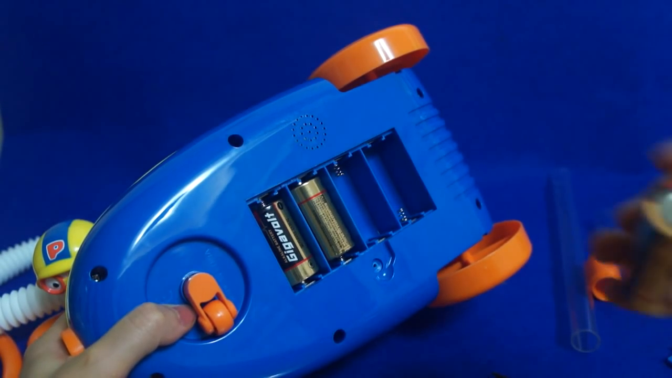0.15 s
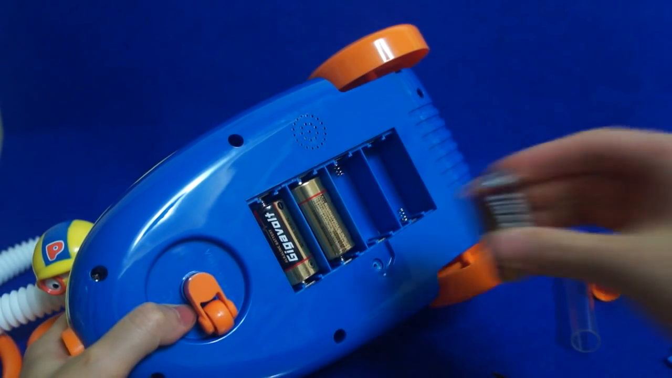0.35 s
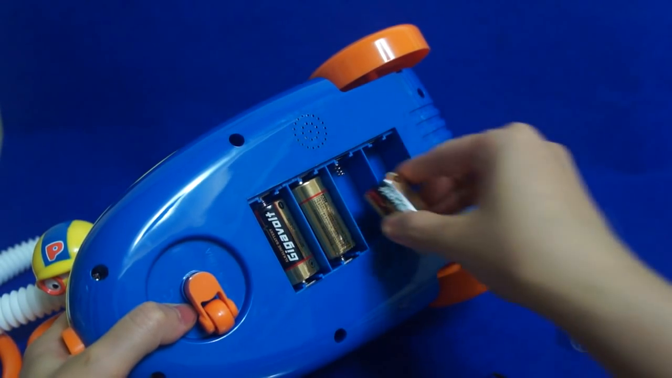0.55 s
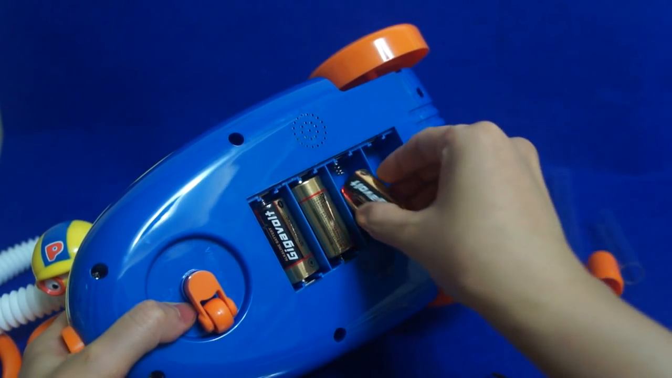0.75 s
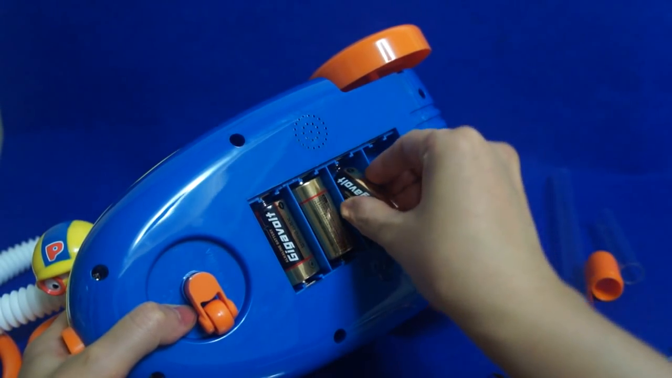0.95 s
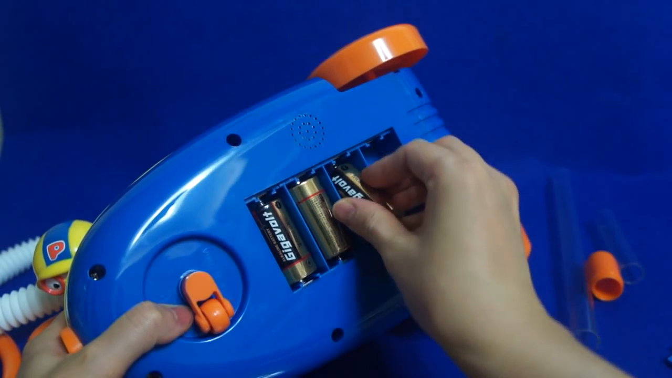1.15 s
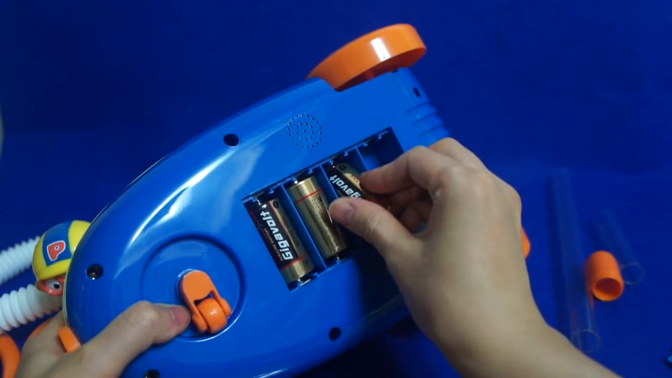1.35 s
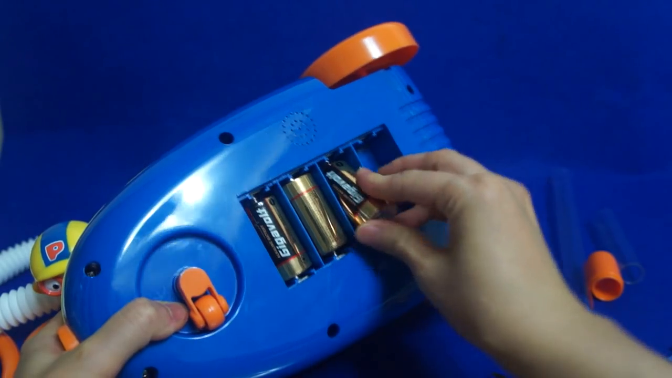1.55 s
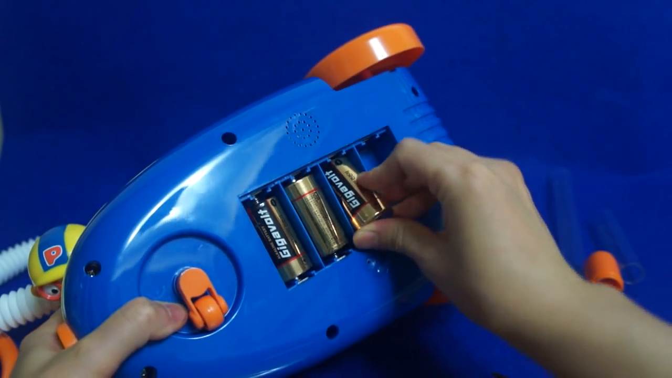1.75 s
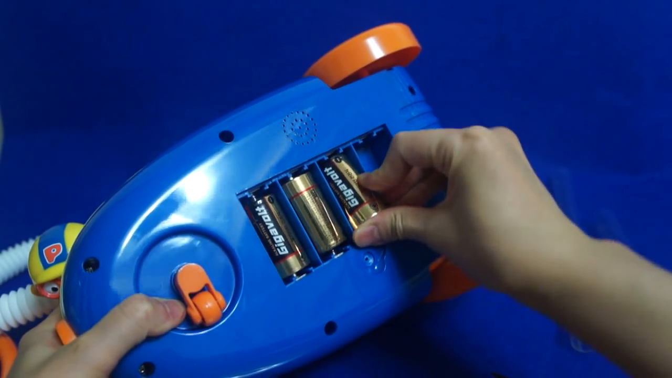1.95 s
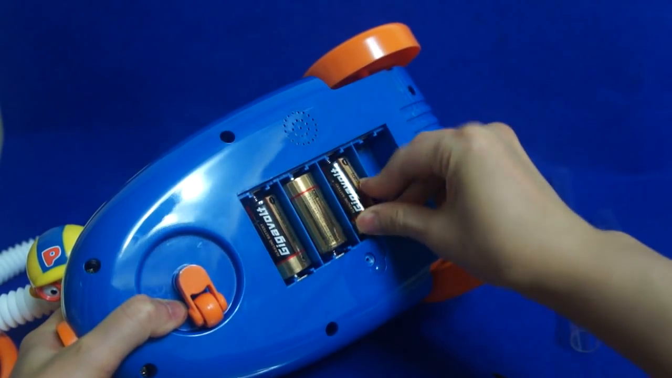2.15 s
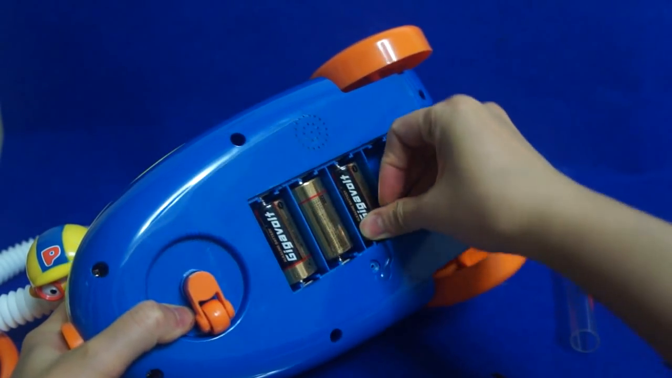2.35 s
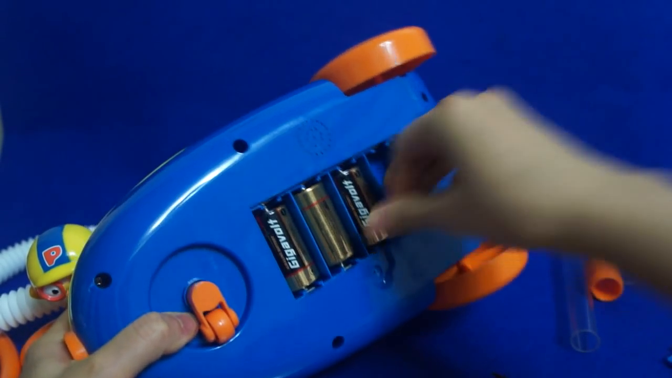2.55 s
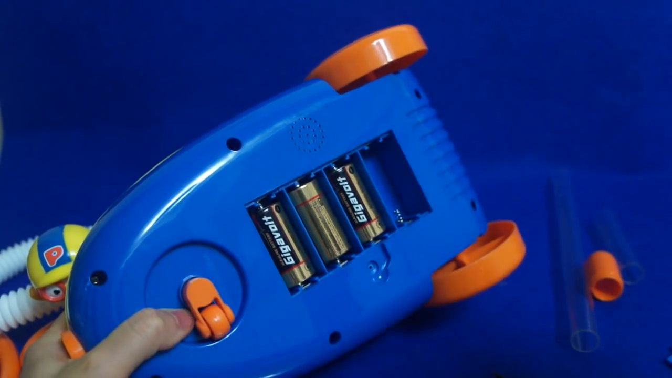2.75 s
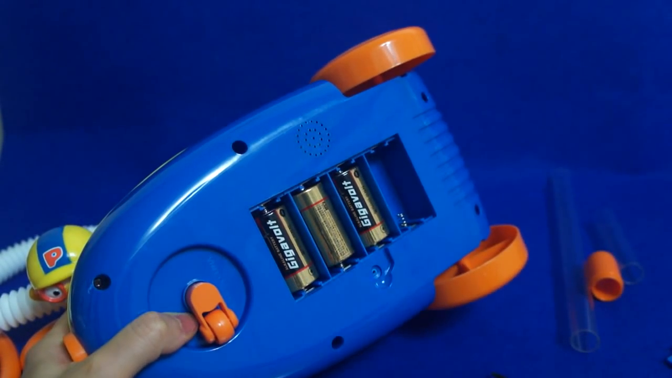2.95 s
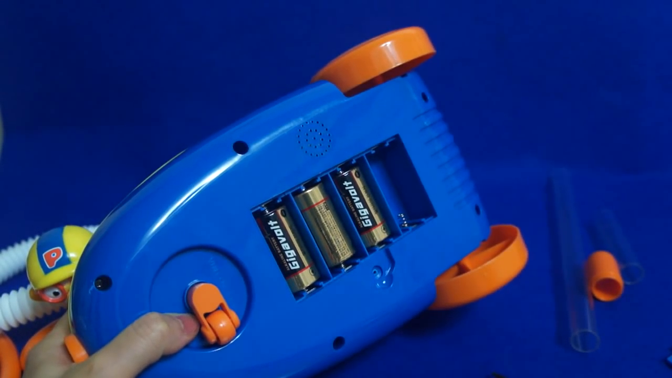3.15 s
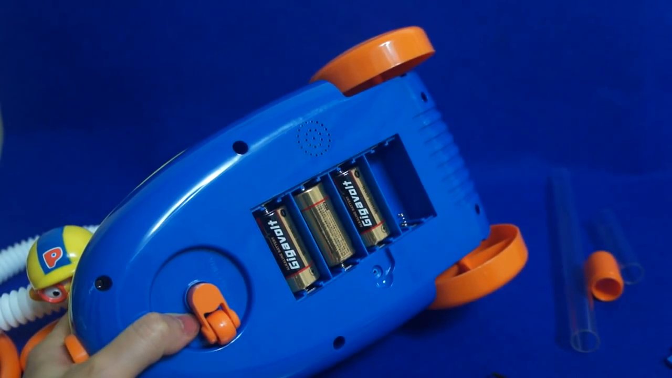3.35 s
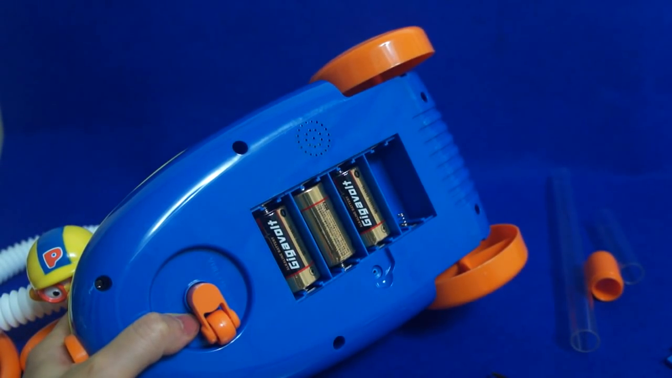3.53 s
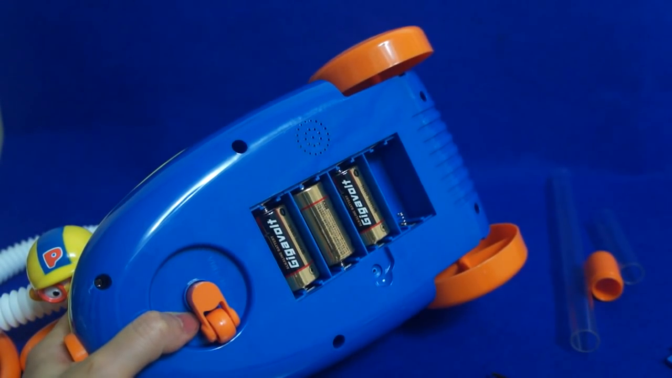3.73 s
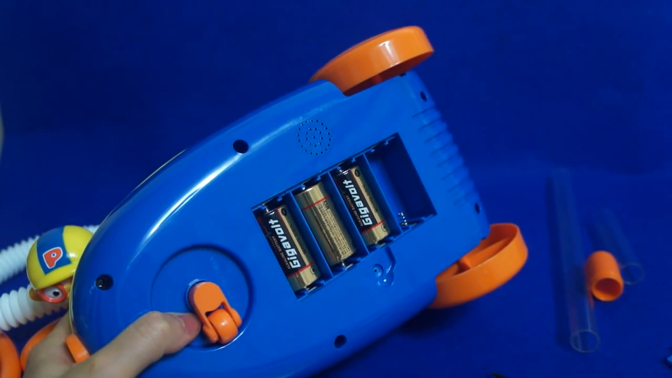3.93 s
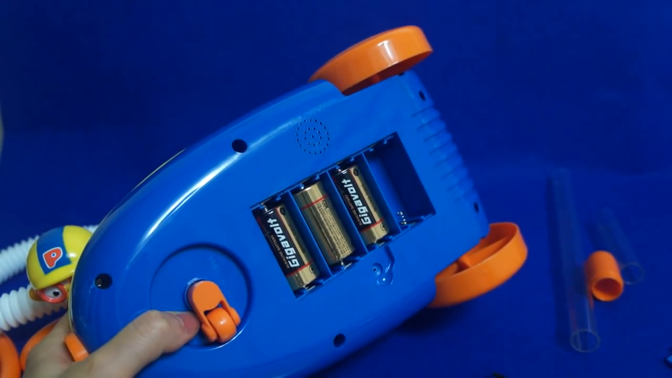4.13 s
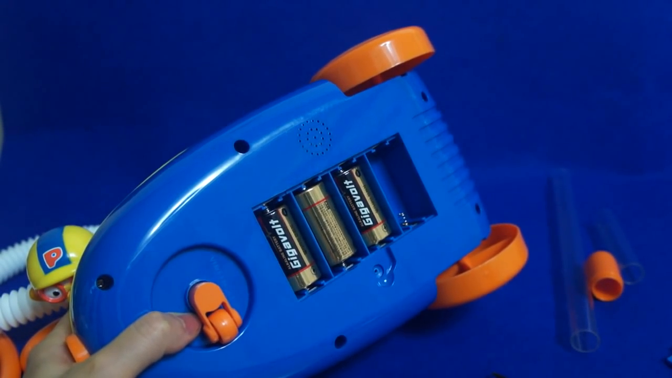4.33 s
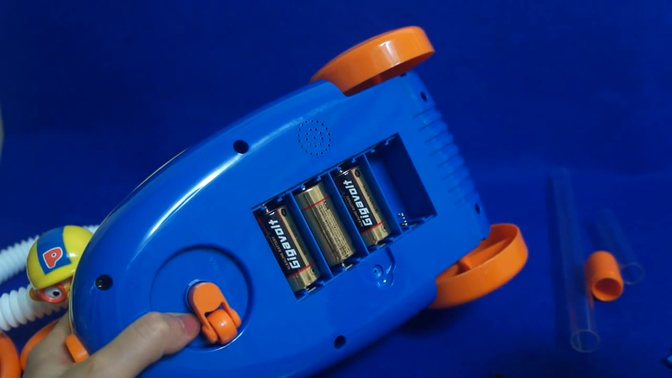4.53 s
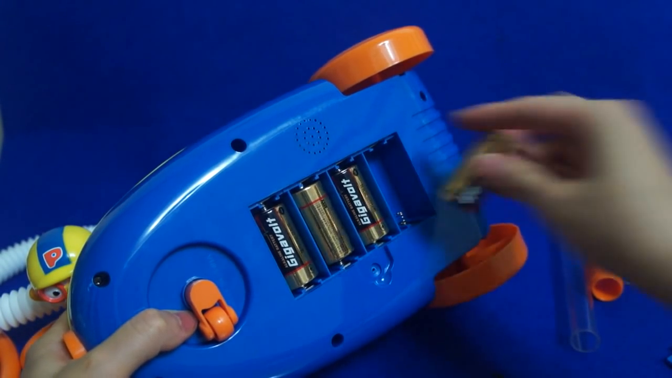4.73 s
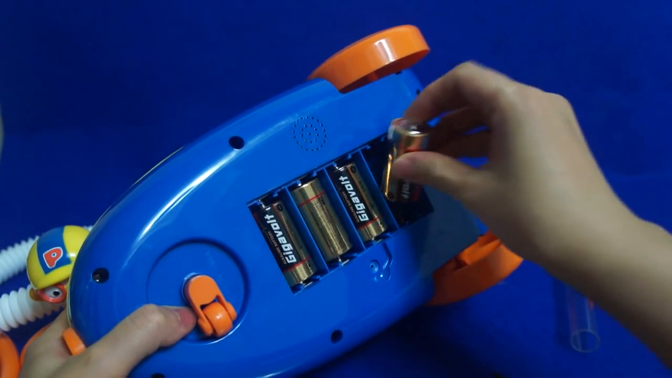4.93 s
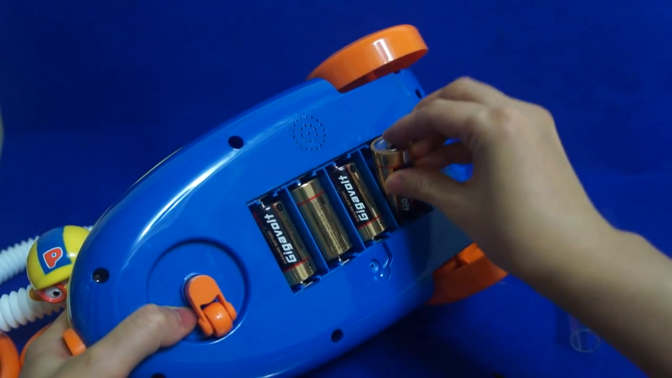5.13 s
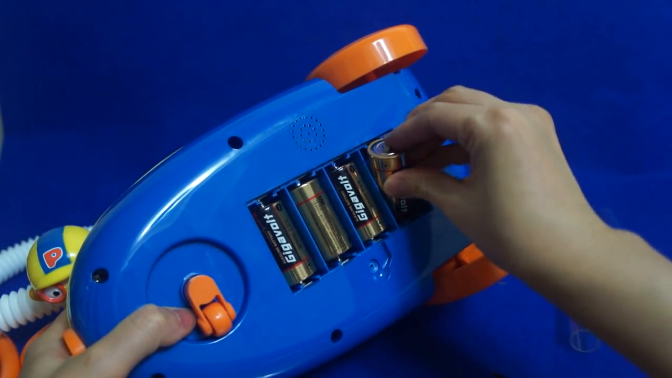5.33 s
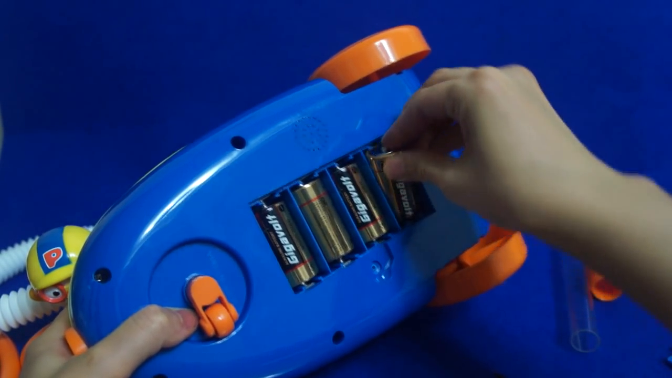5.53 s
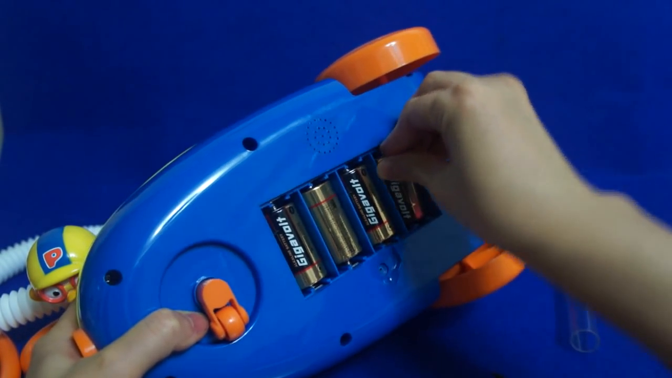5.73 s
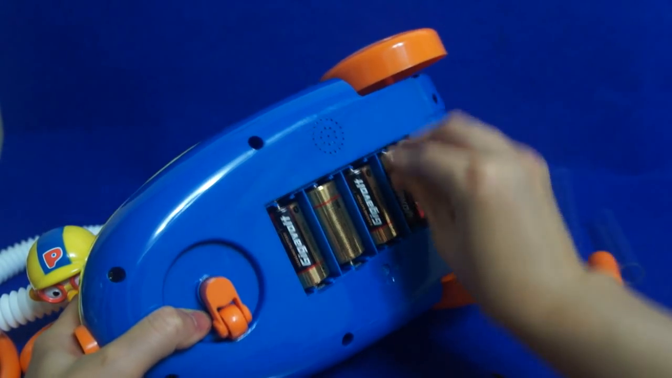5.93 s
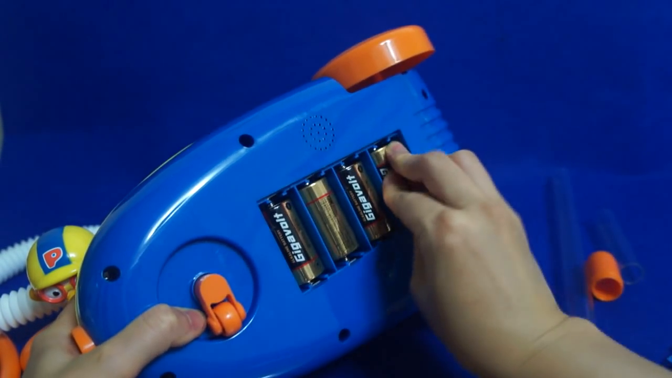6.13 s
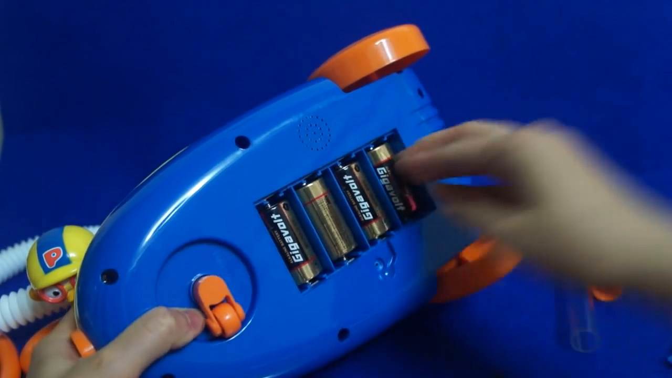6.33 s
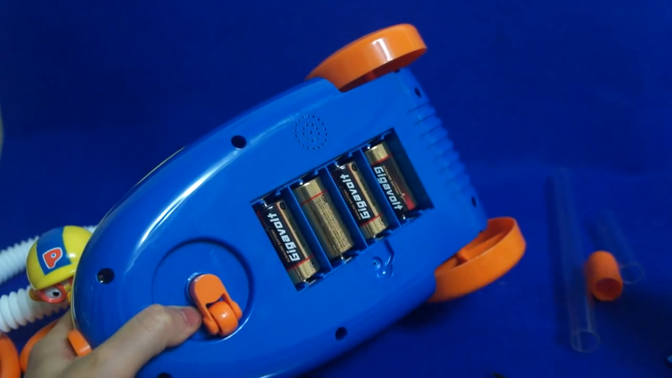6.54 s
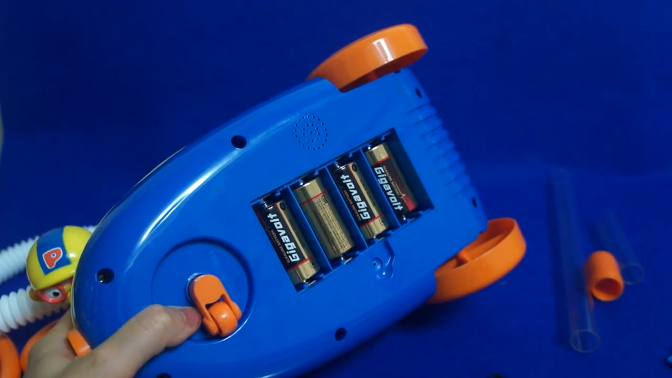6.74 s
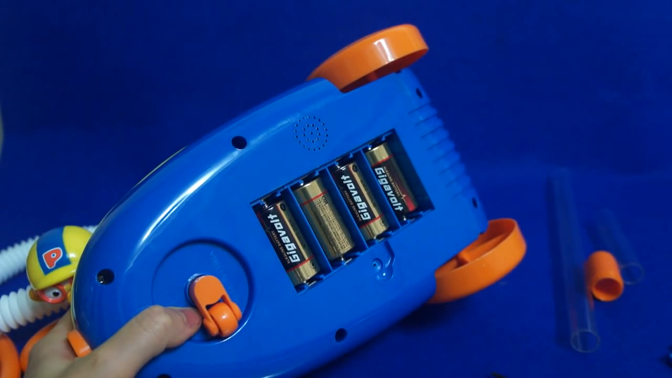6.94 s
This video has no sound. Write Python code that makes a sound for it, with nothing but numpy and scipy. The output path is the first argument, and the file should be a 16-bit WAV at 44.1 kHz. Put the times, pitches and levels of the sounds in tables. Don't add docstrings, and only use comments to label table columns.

```python
import sys
import numpy as np
from scipy import signal
from scipy.fft import rfft, irfft, next_fast_len
from scipy.io import wavfile
from scipy.ndimage import uniform_filter1d

SR = 44100
rng = np.random.default_rng(int(sys.argv[2]) if len(sys.argv) > 2 else 0)


def boost_factor(decibels):
    exponent = np.asarray(decibels, float) / 20
    return 10 ** exponent


def put_to_file(sound):
    columns = np.atleast_2d(sound).T
    safe = np.clip(columns, -1, 1)
    whole_steps = np.round(safe * 32767)
    wavfile.write(sys.argv[1], SR, whole_steps.astype(np.int16))


N = 312228
SHELL_PAN_DB, SLOT_PAN_DB, STROKE_PAN_DB = -1.5, -5, -1.5


def evened(x):
    return x / np.sqrt(np.mean(x ** 2) + 1e-20)


def peak_one(x):
    return x / abs(x).max()


def read(points, hz):
    f, value = np.transpose(points)
    return np.interp(np.log(hz + 1), np.log(f + 1), value)


def colour(x, points, turn=1):
    size = next_fast_len(x.shape[-1])
    gain = boost_factor(read(points, np.fft.rfftfreq(size, 1 / SR)))
    return irfft(rfft(x, size) * turn * gain, size)[..., :x.shape[-1]]


def add(mix, s, sound, pan_db=0):
    part = mix[:, round(s * SR):][:, :len(sound)]
    left, right = boost_factor(pan_db / 2), boost_factor(-pan_db / 2)
    part += 2 * np.array([[left], [right]]) / (left + right) * sound[:part.shape[1]]


def resonate(x, hz, width_hz):
    turn = np.exp(2j * np.pi * hz * np.arange(len(x)) / SR)
    r = np.exp(-np.pi * width_hz / SR)
    return 2 * (turn * signal.lfilter([1 - r], [1, -r], x / turn)).real


def resonate_twice(x, hz, width_hz):
    return resonate(resonate(x, hz, width_hz), hz, width_hz)


def ring(modes, spread_db, rise_turns=0.079, detune=0.0095, size=5000, scatter=1):
    hz, db, t60 = np.transpose(modes)[:, :, None]
    t = np.arange(size) / SR
    weight, pitch, phase = rng.standard_normal((3, len(modes), 1))
    rise = 1 - np.exp(-t * hz / rise_turns)
    decay = boost_factor(db + spread_db * weight - 60 * t / t60)
    start = scatter * phase + np.arange(len(modes))[:, None] / 2
    return (rise * decay * np.sin(2 * np.pi * (hz * (1 + detune * pitch) * t + start))).sum(0)


# f/Hz, level/dB, t60/s
SHELL_MODES = [(440, -12, 0.029), (470.5, -0.5, 0.093), (502.6, -9, 0.13), (547.6, 11.5, 0.074),
               (589.5, 1, 0.083), (612, 3.5, 0.017), (685, -9.5, 0.014)]
# f/Hz, level/dB, t60/s
WALL_MODES = [(726, -12.5, 0.05), (791, -11, 0.049), (818, -7.5, 0.037), (913, -1, 0.035), (969, -4, 0.049),
              (1071, -1.5, 0.031), (1131, 3.5, 0.032), (1217, 0.5, 0.027), (1296, -2.5, 0.043),
              (1364, -5.5, 0.032), (1472, -3.5, 0.027), (1647, -6, 0.031), (1770, -6.5, 0.022),
              (1850, -5, 0.023)]
# f/Hz, level/dB, t60/s
RIB_MODES = [(2048, -8.5, 0.03), (2205, -9, 0.032), (2550, -9, 0.016), (2730, -13, 0.02),
             (3200, -16.5, 0.018), (4000, -15, 0.017), (4500, -28, .015)]
HELD_RING = 0.73
HARD_TIP_SAMPLES, SOFTER_SAMPLES_PER_DB = 6, 0.4


def knock(shell_db, walls_db, contact_ms, free):
    t_ms = np.arange(900) / SR * 1000
    chatter = rng.standard_normal(900) * (rng.random(900) < 0.04) * np.exp(-t_ms / contact_ms)
    pulse = np.hanning(round(HARD_TIP_SAMPLES - SOFTER_SAMPLES_PER_DB * walls_db))
    blow = np.convolve((t_ms == 0) + 0.45 * chatter, pulse)
    shell_ring = ring(np.multiply(SHELL_MODES, [1, 1, free]), 3.0, rise_turns=0.23, size=4500)
    wall_modes = np.multiply(WALL_MODES + RIB_MODES, [1, 1, HELD_RING])
    wall_ring = ring(wall_modes, 1.0, size=2000, scatter=0.098)
    shell = signal.fftconvolve(blow, shell_ring)
    walls = signal.fftconvolve(blow, wall_ring)
    walls = np.pad(walls, (0, len(shell) - len(walls)))
    return boost_factor(shell_db) * peak_one(shell) + boost_factor(walls_db + 0.5) * peak_one(walls)


# t/s, shell peak level/dB, walls peak level/dB
FIRST_KNOCKS = [(0.7487, -19.5, -29), (0.753, -33, -38), (0.764, -50, -31), (0.791, -33, -66),
                (0.893, -42.5, -53), (1.001, -41.5, -69), (1.03, -41, -44), (1.1155, -53, -37.5),
                (1.311, -28, -36), (1.319, -45.5, -47), (1.337, -30, -40), (1.357, -31, -42),
                (1.575, -47, -44.5), (1.648, -41, -38.5), (1.761, -38, -32), (1.789, -37, -46),
                (1.832, -35.5, -42), (1.8365, -35, -33), (1.842, -36, -35.5), (1.865, -50, -53),
                (2.046, -39.5, -36.5), (2.127, -35.5, -33.5), (2.14, -32, -26), (2.214, -46, -61),
                (2.27, -35.5, -27), (2.3235, -22, -14), (2.329, -20.5, -12.5), (2.346, -22.5, -18),
                (2.361, -17, -24), (2.394, -36, -46.5), (2.778, -46, -47), (2.787, -44, -43),
                (4.279, -51.5, -47), (4.295, -42, -49)]
# t/s, shell peak level/dB, walls peak level/dB
SECOND_KNOCKS = [(4.9645, -10.5, -13.5), (4.978, -13.5, -18), (5.007, -25, -39), (5.0755, -16.5, -24.5),
                 (5.089, -22, -58), (5.193, -58, -37.5), (5.233, -23.5, -21), (5.251, -52, -41),
                 (5.3, -17, -18), (5.648, -28.5, -37), (5.655, -41.5, -35), (5.708, -31, -38),
                 (5.732, -39, -55), (5.868, -27.5, -33), (5.879, -37.5, -37), (5.899, -39, -36),
                 (6.06, -35, -26.5), (6.071, -27.5, -25), (6.084, -33, -45), (6.1095, -24.5, -26),
                 (6.114, -26, -31), (6.144, -31, -52), (6.251, -49, -55), (6.363, -53, -47),
                 (6.394, -53, -43), (6.443, -45, -43.5)]
# t/s, shell peak level/dB, walls peak level/dB
TOUCHES = [
    (1.127, -58, -40.5),
    (1.2672, -31, -27),
    (1.2712, -27, -45),
    (2.261, -59, -26),
    (2.3145, -64.5, -28),
    (5.284, -57, -44),
    (1.232, -50, -46),
    (2.559, -42, -35.5),
]
# t/s, shell peak level/dB, walls peak level/dB
SNAPS = [
    (1.2734, -13, -9.5),
    (1.2765, -12.5, -18.5),
    (1.289, -32, -28),
    (1.298, -23, -28),
]


def play_knocks(toy, push):
    for rows, contact_ms, free in ((FIRST_KNOCKS, 2.54, 0.84), (SECOND_KNOCKS, 2.05, 1.1),
                                   (TOUCHES, 3.4, 0.77), (SNAPS, 1.6, 0.29)):
        for s, shell_db, walls_db in rows:
            add(toy, s, knock(shell_db, walls_db, contact_ms, free), SHELL_PAN_DB)
            add(push, s, boost_factor(shell_db - 23.5) * np.hanning(160))


# f/Hz, level/dB, t60/s
BELLY_MODES = [(207, -6.5, 0.22), (247, -3, 0.032), (282.5, 0, 0.081), (320, -4, 0.022), (345, 6.5, 0.077),
               (400, -6, 0.039)]
# t/s, peak level/dB, strongest mode f/Hz
THUDS = [(0.7481, -26.5, 310), (1.041, -48, 320), (1.235, -43.5, 318), (1.276, -22, 225), (1.788, -34, 300),
         (1.833, -30.5, 219), (2.048, -40, 276), (2.125, -36, 330), (2.138, -33.5, 320), (2.211, -32, 311),
         (2.266, -40, 276), (2.328, -9, 345), (2.341, -16, 328), (2.557, -49, 225), (2.786, -47, 213),
         (4.962, -28.5, 310), (5.075, -29.5, 320), (5.193, -48, 334), (5.231, -30.5, 317),
         (5.298, -26, 297), (5.652, -30.5, 312), (5.707, -38, 320), (5.732, -38, 320), (5.866, -29.5, 330),
         (5.893, -54, 363), (6.065, -31, 297), (6.07, -28.5, 320), (6.109, -26, 297), (6.444, -43, 302),
         (2.33, -13, 207)]
THUD_TURNS = 19


def play_thuds(toy, push):
    for s, db, hz in THUDS:
        modes = [(hz, 14.0, THUD_TURNS / hz)] + BELLY_MODES
        add(toy, s, boost_factor(db) * peak_one(ring(modes, 5.0, rise_turns=0.61)), -1.2)
        add(push, s, boost_factor(db - 31) * np.hanning(700))


# f/Hz, level/dB
CRACK_COLOUR = [(900, -1), (1800, 5.5), (3000, 9.5), (5000, 9.5), (8000, 7), (10500, 3)]
RING_DULLS_DB_PER_OCT = 10


def tick(db, hz, t60, share):
    t = np.arange(2000) / SR
    dull_db = share * RING_DULLS_DB_PER_OCT
    spectrum = [(f, d - dull_db * max(np.log2(f / hz), 0)) for f, d in CRACK_COLOUR]
    crack = colour(rng.standard_normal(2000), spectrum)
    crack = crack * boost_factor(-60 * t / t60) * (1 - np.exp(-t / 0.00015))
    cluster = [(hz, 0, t60 * 0.7), (hz * 1.1, -4, t60 * 0.6), (hz * 0.9, -5, t60 * 0.5)]
    modes = ring(cluster, 2, 1.5, size=2000)
    return boost_factor(db) * ((1 - share) * peak_one(crack) + share * peak_one(modes))


# t/s, peak level/dB, ringing f/Hz, ring share [0-1]
FIRST_TICKS = [(0.7488, -30, 3650, 0.42), (1.002, -42, 3040, 0.76), (1.0499, -26, 2680, 0.2),
               (1.2714, -30.5, 2420, 0), (1.2762, -15, 2900, 0.25), (1.55, -44, 3030, .5),
               (1.7702, -35, 2850, 0.38), (1.7893, -21, 2930, 0.36), (1.8355, -28, 3150, 0.25),
               (2.125, -31.5, 2580, 0.26), (2.138, -27, 2930, 0.4), (2.2116, -24, 3500, 0.33),
               (2.267, -13.5, 4940, 0.17), (2.3225, -17, 3200, 0.06), (2.3278, -12.5, 4000, 0.2),
               (2.3303, -9.5, 2550, 0.18), (2.3345, -15.5, 2670, 0), (2.6765, -30, 6460, 0.4)]
# t/s, peak level/dB, ringing f/Hz, ring share [0-1]
SECOND_TICKS = [(4.9655, -30, 2500, 0), (4.972, -32, 2570, 0), (4.979, -33, 2440, 0.3),
                (5.0712, -29, 3300, 0.3), (5.233, -39.5, 2700, 0.1), (5.2987, -34.5, 3000, 0.1),
                (5.8975, -22.5, 3880, 0.35), (5.6464, -34, 3000, 0.03), (5.7324, -36.5, 3000, 0.34),
                (5.8942, -20, 4150, 0.03), (6.06, -26.5, 2470, 0.1), (6.066, -21.5, 4100, 0.2),
                (6.0715, -21.5, 3120, 0.5), (6.109, -21, 2310, 0.2), (6.12, -36, 3670, 0),
                (6.498, -34, 3010, 0.24), (6.9712, -40.5, 3400, 0)]


def play_ticks(toy):
    for rows, t60_s in ((FIRST_TICKS, 0.022), (SECOND_TICKS, 0.033)):
        for s, db, hz, share in rows:
            add(toy, s, tick(db, hz, t60_s, share), SLOT_PAN_DB)


# t of peak/s, peak level/dB, f/Hz, rise/ms
BLIPS = [(0.7415, -27.5, 1880, 1.47), (0.7495, -32, 2000, 1), (0.76, -31, 950, 3), (1.2775, -10, 560, 3),
         (1.0505, -38, 10060, .6), (1.0505, -34, 4900, .8), (1.118, -43, 304, 3.1),
         (1.277, -27, 6100, 1.185), (1.277, -43, 9800, 1.2), (1.286, -35, 2950, 1.8),
         (1.287, -37, 5440, 2), (1.667, -45, 1120, 3.7), (1.79, -29, 9900, 0.52),
         (2.2678, -15, 4700, 0.42), (2.2678, -19.5, 9700, .5), (2.268, -20.5, 2140, 0.69),
         (2.316, -34, 2250, 3.6), (2.3288, -15, 9900, 0.74), (2.328, -16, 7300, .6),
         (2.3315, -26, 5980, 0.833), (2.336, -25, 2080, 1.66), (2.337, -23, 1485, 1.9),
         (2.338, -13, 985, 2.8), (2.339, -16, 556, 4.3), (2.427, -37.5, 208, 20), (2.649, -48, 1200, 2),
         (2.677, -46, 4500, 1.5), (2.685, -38, 6700, 1.8), (2.686, -41, 1850, 2), (2.69, -49, 5500, 3),
         (2.6945, -44, 6750, 1.5), (4.969, -21.5, 311, 4.16), (4.967, -19, 1020, 2), (1.79, -29, 3200, .7),
         (2.2125, -33, 4000, .7), (5.358, -36, 5700, 1), (4.972, -12.5, 554, 5), (4.97, -33.5, 6700, 1.5),
         (5.072, -40, 5330, 1), (5.0735, -22.5, 2050, 1.61), (5.8942, -31, 2720, 0.58),
         (5.895, -18.5, 4400, 0.51), (5.895, -21.5, 7420, .6), (6.068, -36, 5810, 1.7),
         (6.0695, -29, 4000, .8), (6.075, -37, 205, 5.4), (6.087, -30, 562, 4.1), (6.103, -41, 7350, 2.2),
         (6.11, -24.5, 8380, .5), (6.1099, -20.5, 3790, 0.53), (6.115, -16, 575, 4.14),
         (6.113, -33, 211, 5.7), (6.123, -36, 6500, 1.5)]


def play_blips(near):
    for s, db, hz, rise_ms in BLIPS:
        rise_s = rise_ms / 1000
        u = np.arange(round(6 * rise_s * SR)) / SR / rise_s
        turns = hz * u * rise_s
        tone = np.sin(2 * np.pi * turns) + 0.16 * np.sin(2 * np.pi * 1.11 * turns)
        add(near, s - rise_s, boost_factor(db) * (u * np.exp(1 - u)) ** 2 * tone, -2.2)


def pip(db, hz, t60):
    modes = [(hz, 0, t60), (hz * 1.2, -6, t60 * 0.62)]
    return boost_factor(db) * peak_one(ring(modes, 1.5, rise_turns=1.9))


# t/s, peak level/dB, f/Hz, t60/s
TRAY = [(0.749, -25, 1132, 0.057), (1.2747, -9, 1081, 0.017), (1.286, -27, 1470, 0.029),
        (2.267, -26.5, 1170, .025), (2.3245, -10, 1080, 0.03), (4.9654, -16.5, 1047, 0.021),
        (4.986, -24, 1274, 0.036), (5.233, -24, 1216, 0.027), (5.299, -20.5, 1210, 0.034),
        (5.334, -42, 1250, .04), (5.35, -31, 1196, 0.03), (5.361, -35, 1146, .04),
        (5.375, -44, 1200, 0.027), (5.384, -34, 1207, 0.021), (5.396, -36, 1200, 0.034),
        (5.411, -37, 1257, 0.04), (4.285, -46.5, 1080, 0.043), (6.183, -41, 1210, 0.017)]


def play_tray(toy):
    for s, db, hz, t60 in TRAY:
        add(toy, s, pip(db, hz, t60), SHELL_PAN_DB)


# t/s, peak level/dB, f/Hz, t60/s
SLOT_PIPS = [(0.7372, -44, 1840, 0.012), (0.794, -49, 2010, .02), (0.861, -47, 2000, .02),
             (0.89, -43, 1720, 0.012), (0.9214, -51, 2080, 0.033), (0.7807, -36, 2010, 0.028),
             (1.2749, -16, 1880, 0.014), (1.5507, -45.5, 1660, 0.023), (1.58, -49, 1770, 0.019),
             (1.771, -42, 1560, 0.014), (2.05, -40, 1430, 0.0098), (2.139, -30, 2070, 0.0058),
             (2.2692, -30, 2170, 0.022), (2.675, -38, 1850, 0.021), (4.975, -24, 1950, 0.016),
             (5.0705, -35, 2020, 0.016), (5.477, -34, 1830, 0.0077), (5.732, -33.5, 1380, 0.023),
             (6.061, -28, 2390, 0.032), (6.111, -28.5, 2230, 0.011), (6.4812, -43.5, 2235, 0.085),
             (6.5003, -32.5, 2100, 0.0034), (6.9837, -45, 2250, 0.065), (7.067, -47, 1550, 0.028)]


def play_slot_pips(near):
    for s, db, hz, t60 in SLOT_PIPS:
        add(near, s, pip(db, hz, t60), -1.1)


# t/s, peak level/dB, f/Hz, t60/s
SPRINGS = [(1.052, -49, 4100, 0.16), (1.283, -34, 7000, 0.05), (2.14, -45, 2070, 0.18),
           (2.676, -37, 6690, 0.04), (4.969, -42, 6940, 0.044), (4.978, -38, 6720, 0.09),
           (5.284, -46, 6860, 0.018), (5.293, -50, 6900, .015), (6.971, -47, 1530, 0.14),
           (6.974, -51.5, 3390, 0.2), (6.985, -52, 2250, 0.37), (1.578, -54, 3080, 0.025),
           (1.81, -47, 4000, .02)]


def play_springs(near):
    for s, db, hz, t60 in SPRINGS:
        modes = [(hz, 0, t60), (hz * 1.03, -3, t60 * 0.7), (hz * 0.97, -4, t60 * 0.7), (hz * 1.2, -8, t60 * 0.4)]
        coil = ring(modes, 2.5, rise_turns=1.9, detune=0.012)
        add(near, s, boost_factor(db) * peak_one(coil), -1.1)


# f/Hz, width/Hz, level/dB
RASP_BANDS = [(3300, 900, -2), (4200, 900, 0), (5600, 900, 1), (7000, 1300, -6), (8400, 1200, -5),
              (9900, 1200, -8)]
SLOT_WALLS_DB = 5.5
START_DB, FADE_DB = -9.5, -16


def scrape(length_s, grip, shell_db, rasp_db):
    t = np.arange(0, length_s, 1 / SR)
    slips = rng.standard_normal(len(t)) * (rng.random(len(t)) < 5000 / SR)
    slips = slips * boost_factor(rng.exponential(1, len(t)))
    walls = [(hz, db + SLOT_WALLS_DB, t60) for hz, db, t60 in WALL_MODES + RIB_MODES]
    body = signal.fftconvolve(slips, ring(SHELL_MODES + walls, 2.5))[:len(t)]
    shift = 1 + 0.015 * rng.standard_normal()
    rasp = sum(boost_factor(db) * resonate_twice(slips, hz * shift, width) for hz, width, db in RASP_BANDS)
    firmest = np.clip(grip, 0.02, 0.9)
    pressure = boost_factor(np.interp(t / t[-1], [0, firmest, 1], [START_DB, 0, FADE_DB]))
    sound = boost_factor(shell_db) * evened(body) + boost_factor(rasp_db) * evened(rasp)
    return pressure * sound * signal.windows.tukey(len(t), 0.15)


# t/s, length/s, share before firmest pressure [0-1],
# shell level/dB, rasp level/dB
STROKES = [(0.851, 0.2, 0.35, -54, -71), (0.978, 0.11, 0.58, -52.5, -65), (1.62, 0.05, 1, -45, -48),
           (1.658, 0.062, 0.23, -48, -66), (1.752, 0.12, 0.41, -41.5, -59), (2.138, 0.16, 0.1, -47, -58),
           (2.185, 0.028, 0.43, -73, -52), (2.668, 0.06, 0.29, -50, -52), (5.318, 0.059, 0.73, -45, -57),
           (5.355, 0.031, 0.31, -46, -60), (5.373, 0.055, 0.85, -48, -53), (5.642, 0.068, 0.18, -45.5, -57),
           (5.697, 0.06, 0.24, -39, -55.5), (5.904, 0.12, 0.09, -68, -56), (6.076, 0.085, 0.32, -37.5, -50),
           (6.207, 0.21, 0.36, -57, -80), (6.349, 0.13, 0.32, -52.5, -73), (6.477, 0.074, 0.43, -52.5, -61)]


def play_strokes(toy):
    for s, length_s, grip, shell_db, rasp_db in STROKES:
        add(toy, s, scrape(length_s, grip, shell_db, rasp_db), STROKE_PAN_DB)


# f/Hz, width/Hz, level/dB
SQUEAK_BANDS = [(2510, 500, -3), (3800, 1200, -2.5), (5640, 710, 2), (7850, 1200, -9)]
# t/s, peak level/dB, tilt/(dB per octave)
JERKS = [
    (5.3447, -39, 1),
    (5.3576, -31.5, 4),
    (5.3687, -39, -1),
    (5.38, -39, -8),
    (5.3917, -33.5, .4),
    (5.3954, -37, -2),
    (5.4018, -32.5, 6),
    (5.409, -36, -15),
    (5.415, -43, -10),
]
JERK_T60_S = 0.029


def play_jerks(toy):
    t = np.arange(1500) / SR
    for s, db, tilt_db in JERKS:
        burst = rng.standard_normal(1500) * boost_factor(-60 * t / JERK_T60_S)
        squeak = sum(boost_factor(d + tilt_db * np.log2(hz / 4500)) * resonate_twice(burst, hz, width)
                     for hz, width, d in SQUEAK_BANDS)
        add(toy, s, boost_factor(db) * peak_one(squeak), STROKE_PAN_DB)


# f/Hz, level/dB
PORTS = [(60, -2), (110, 7), (190, -23), (340, -15.5), (610, -5.5), (1100, -4.5), (1960, 2), (3500, 4),
         (6260, 2), (11200, 3.5)]
# f/Hz, level/dB
TREBLE_LEAN = [(4000, -41), (7000, -21), (9500, -11)]


def port_difference(direct):
    apart = boost_factor(-6.5) * colour(direct, PORTS, 1j) - colour(direct, TREBLE_LEAN)
    return np.array([-apart, apart])


# f/Hz, t60/s
ROOM_T60 = [(150, 0.42), (400, 0.38), (1000, 0.38), (2500, 0.29), (5000, 0.29), (9000, 0.35)]


def room(x):
    taps = np.zeros((3, 2, SR // 2))
    at = np.arange(260, SR // 2 - 20, 20) + rng.integers(0, 20, (3, 2, (SR // 2 - 261) // 20))
    np.put_along_axis(taps, at, rng.choice([-1.0, 1.0], at.shape), 2)
    hz, t, z = signal.stft(taps, SR, nperseg=256)
    tail = signal.istft(z * boost_factor(-60 * t / read(ROOM_T60, hz)[:, None]), SR, nperseg=256)[1]
    tail /= np.sqrt((abs(rfft(tail)) ** 2).mean())
    phase = 23 * np.arange(N) / SR + np.arange(3)[:, None, None] / 3
    turns = np.sqrt(2 / 3) * np.cos(2 * np.pi * phase)
    both, apart = signal.fftconvolve(x * turns, tail, axes=2)[..., :N].sum(0)
    mid_side = np.array([both, colour(apart, PORTS) * boost_factor(-0.5)])
    mid, side = colour(mid_side, [(200, -14.5), (400, -10), (560, -13), (760, -6.5), (1150, -8.0),
                                  (2500, -5.5), (6000, -9.5), (10000, -12.5)])
    return np.array([mid + side, mid - side])


# f/Hz, level/(dB per Hz)
HISS_SPECTRUM = [(15, -28.5), (25, -15), (47, -37), (70, -2), (108, -5), (132, -4), (286, 4), (334, 3),
                 (587, 0), (1030, -3.5), (1110, -3), (1910, -6), (8900, -14.5), (10400, -14.5),
                 (11500, -105), (15000, -88), (22000, -120)]
# f/Hz, correlation [-1 to 1]
HISS_LIKENESS = [(60, 0.39), (170, -0.37), (490, -0.17), (1380, -0.43), (3930, -0.22), (11200, 0.099)]
HISS_DB, HUM_DB, HUM_HZ, HUM_WIDTH_HZ = -56.5, -77, 82, 6.5


def hiss():
    frames, hz = N // 512 + 5, np.fft.rfftfreq(2048, 1 / SR)
    a, b, c, d, patches = rng.standard_normal((frames, 1025, 5)).T
    patches = evened(uniform_filter1d(uniform_filter1d(patches, 20, 0), 8, 1))
    same = read(HISS_LIKENESS, hz)[:, None]
    left = a + 1j * b
    right = same * left + np.sqrt(1 - same ** 2) * (c + 1j * d)
    level = boost_factor(read(HISS_SPECTRUM, hz)[:, None] + 0.54 * patches) / np.sqrt((1 + same) / 2)
    noise = signal.istft(np.array([left, right]) * level, nperseg=2048, noverlap=1536)[1][:, :N]
    hum = evened(resonate_twice(rng.standard_normal(N), HUM_HZ, HUM_WIDTH_HZ))
    return boost_factor(HISS_DB) * noise / noise.mean(0).std() + boost_factor(HUM_DB) * hum


def scene():
    toy, near, push = np.zeros((3, 2, N))
    play_knocks(toy, push)
    play_thuds(toy, push)
    play_ticks(toy)
    play_blips(near)
    play_tray(toy)
    play_slot_pips(near)
    play_springs(near)
    play_strokes(toy)
    play_jerks(toy)
    toy = signal.sosfilt(signal.butter(4, 196.0, "high", fs=SR, output="sos"), toy)
    direct = toy + near
    reflections = room((toy + boost_factor(-5.5) * near).mean(0))
    return direct + push + port_difference(direct.mean(0)) + reflections + hiss()


def band_limit(x):
    return signal.sosfilt(signal.butter(12, 11790, fs=SR, output="sos"), x)


# f/Hz, level/dB
BAND_EDGE = [(10000, -0.5), (10500, -11), (10900, -48), (12500, -70), (22000, -95)]
# t/s, share muted [0-1]
MUTE = [
    (2.2455, 0),
    (2.2475, 1),
    (2.2605, 1),
    (2.2635, 0),
]


def record(dry):
    soft = dry / (1 + abs(dry / 0.98) ** 8) ** (1 / 8)
    limited = colour(soft, BAND_EDGE)
    treble = limited - signal.sosfilt(signal.butter(4, 700, fs=SR, output="sos"), limited)
    s, share = np.transpose(MUTE)
    finished = limited - np.interp(np.arange(N) / SR, s, share) * treble
    return band_limit(finished)


dry = scene()
out = record(dry)
put_to_file(out)
```